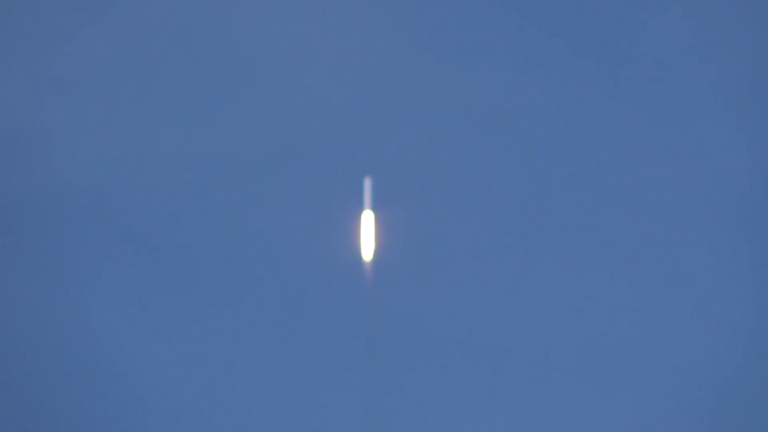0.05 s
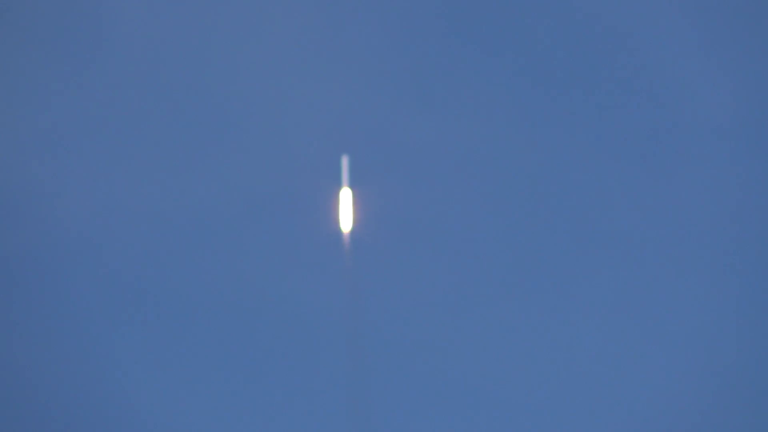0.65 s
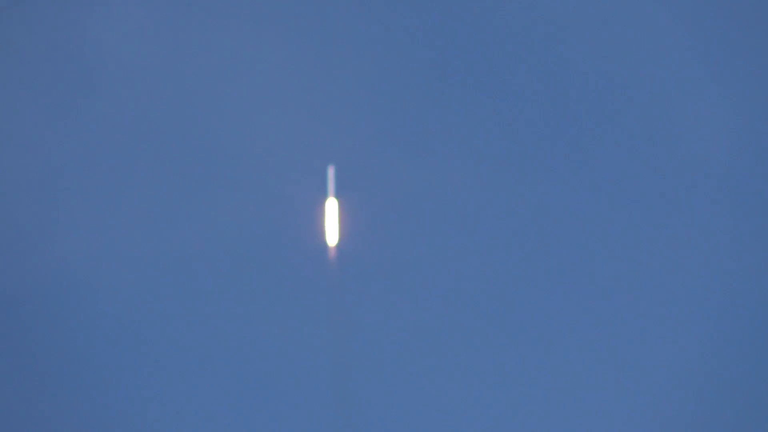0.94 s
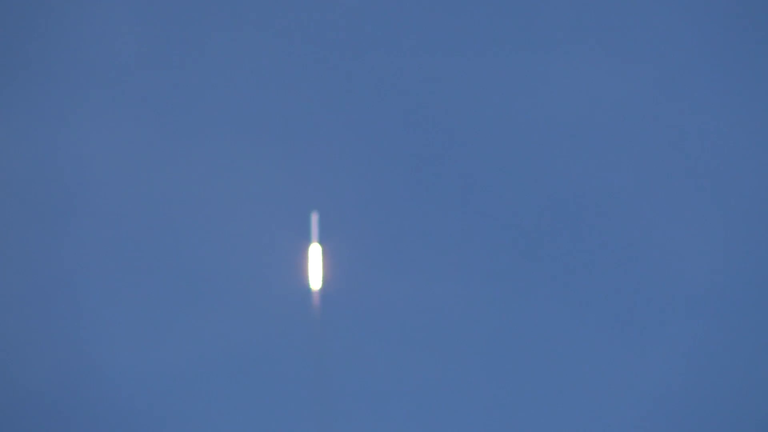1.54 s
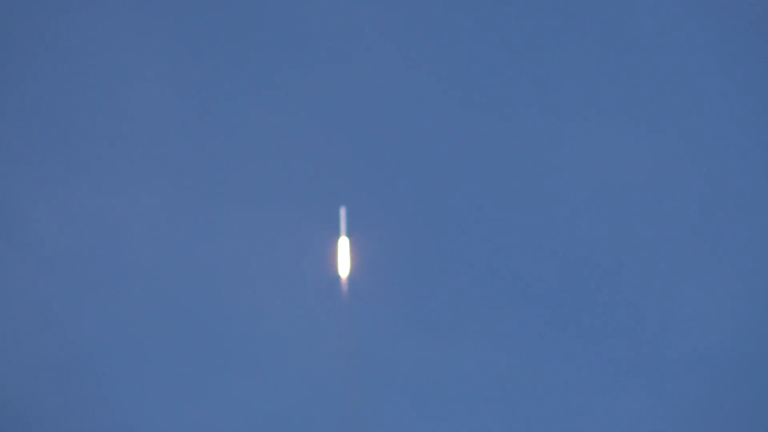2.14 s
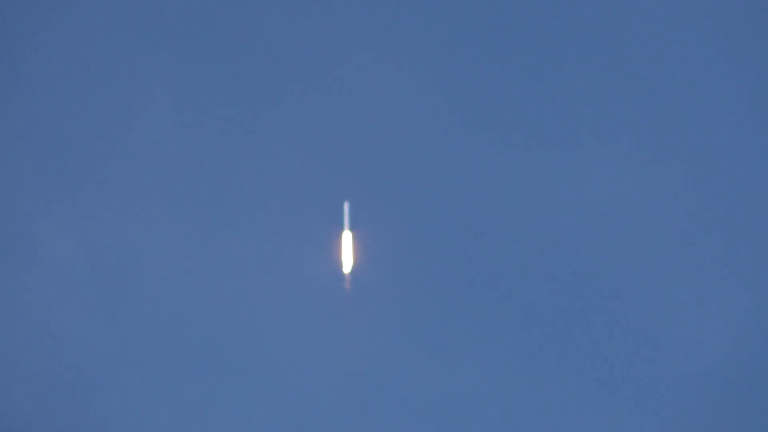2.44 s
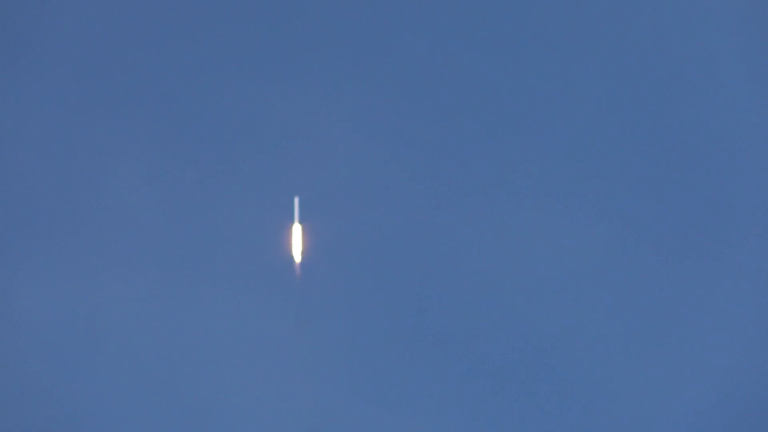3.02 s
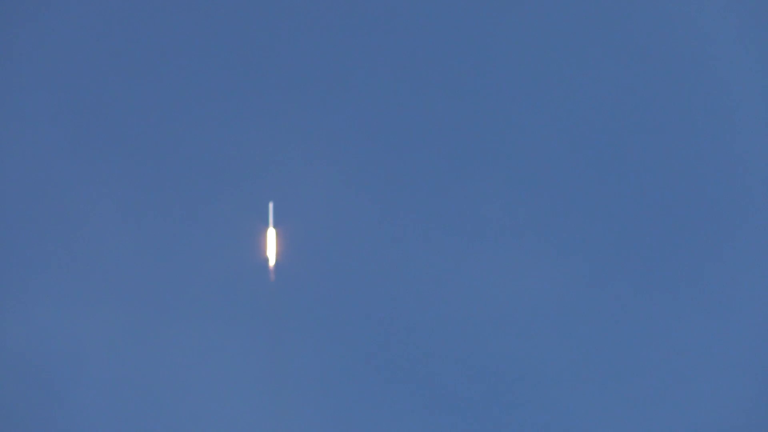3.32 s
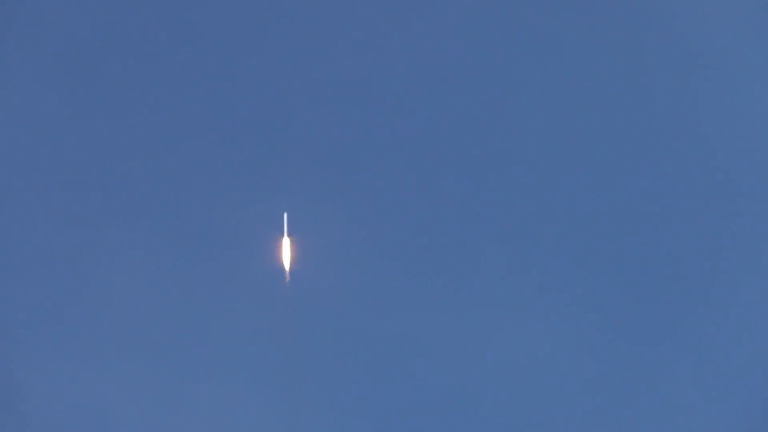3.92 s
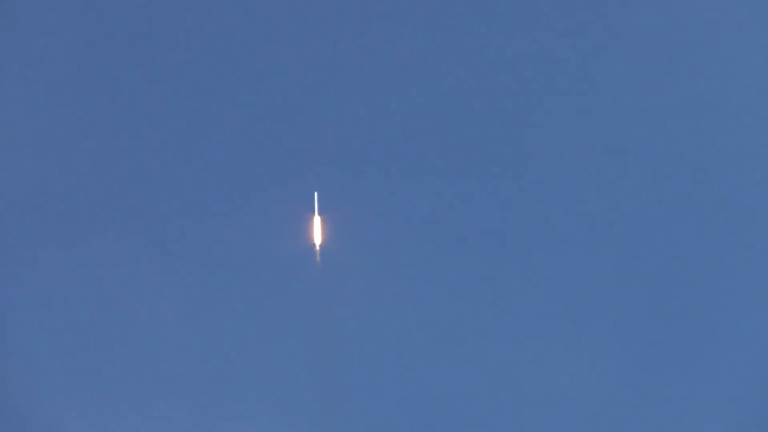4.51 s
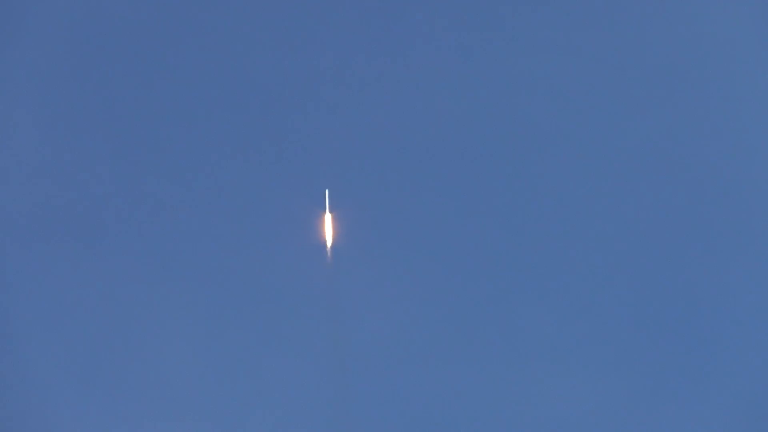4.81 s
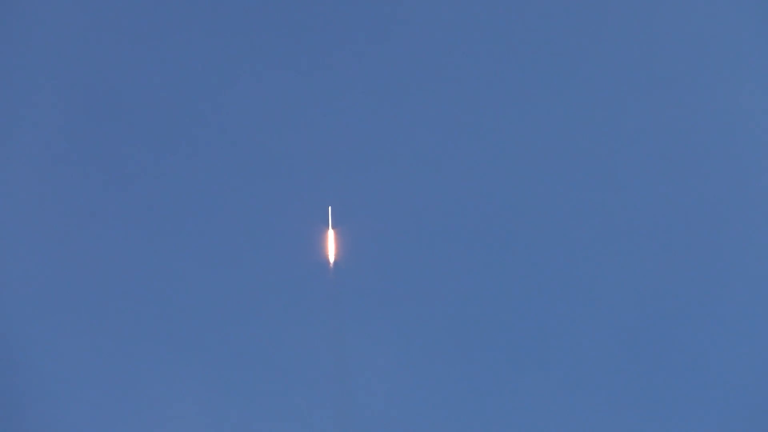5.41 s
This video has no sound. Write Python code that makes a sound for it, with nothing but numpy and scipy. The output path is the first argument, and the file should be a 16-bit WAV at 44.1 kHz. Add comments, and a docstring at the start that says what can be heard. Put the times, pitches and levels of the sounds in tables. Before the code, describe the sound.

A rocket climbs far overhead, heard from open ground through a small camera microphone. Its loud, deep rumble and wavering boom run throughout, under a rough roar dulled by distance. Irregular dull pops and crisp crackles break through from the start. Near the end the crackling grows sharper and denser, briefly overloading the microphone, with a faint tinny rattle.

```python
"""A rocket climbs far overhead, heard from open ground through a small camera's two microphone ports.
Big exhaust eddies rumble and boom; shock fronts bunch into a crackling roar, dulled by kilometres of air.
The hardest shocks pin the microphone for a moment, a loose part buzzes, and a limiter holds the peaks.
Far back in the mix sit a thin whine, tiny falling chirps and a faint hiss."""
import sys
import numpy as np
from scipy import signal
from scipy.fft import rfft, irfft
from scipy.io import wavfile
from scipy.ndimage import uniform_filter1d, minimum_filter1d

SR = 44100
rng = np.random.default_rng(int(sys.argv[2]) if len(sys.argv) > 2 else 0)


def unload_audio(sound):
    """Save the sound as a 16-bit wav file, at the path given as the first command line argument."""
    columns = np.transpose(np.atleast_2d(sound))
    # keep every value between -1 and 1, then stretch to whole-number steps
    steps = np.round(np.clip(columns, -1, 1) * 32767)
    wavfile.write(sys.argv[1], SR, steps.astype(np.int16))


N = 244975
T = np.arange(N) / SR
SIDE = np.array([[1], [-1]])  # adds to the left, subtracts from the right

# Table levels are relative: each layer applies its own trim and EQ.
# fader ride of the whine: t/s, level/dB
WHINE_RIDE = [(0, -92.5), (1.5, -90.5), (2.3, -86), (3.0, -96), (3.55, -87), (4.0, -96.5)]
# the chirps start lower as time passes: t/s, starting f/Hz
CHIRP_PITCH = [(0.4, 13200), (4.199, 7200)]
# short buzzes of a loose part on the camera: t/s, level/dB
BUZZ_CUES = [(0.0408, -42.5), (0.698, -39), (0.978, -31), (4.3859, -38), (4.555, -43), (4.608, -47),
             (4.7209, -38), (4.773, -43), (4.886, -37), (4.941, -47), (5.1613, -42.5), (5.327, -42.5),
             (5.494, -45)]
# the part chatters on once the shocks turn sharp: t/s, level/dB
CHATTER_RIDE = [(0, -82), (4.25, -86), (4.5, -72), (5.0, -80), (5.17, -69.5), (5.55, -73)]
# shocks that pin the microphone: t/s, hold/s, snap on sticking/dB, snap on release/dB
OVERLOAD_CUES = [(4.4938, 0.0044, -30, -25.5), (4.87, 0.0032, -38, -28.5), (4.9813, 0.0035, -37, -28),
                 (5.13, 0.0049, -39, -34)]
# steep fronts that snap in the treble: t/s, level/dB
SNAP_CUES = [(0.3439, -51), (0.385, -47), (0.7783, -48), (1.1672, -48), (1.2436, -45), (1.4077, -47),
             (1.5453, -43), (1.5775, -46), (1.6707, -44), (2.1314, -47), (2.2224, -46), (2.2962, -46),
             (2.32, -42.5), (2.4003, -40), (2.5015, -47), (2.5137, -46), (2.532, -44), (2.7606, -48),
             (3.197, -47), (3.3342, -48), (3.617, -44), (3.6714, -43), (3.686, -41.5), (3.763, -46),
             (3.924, -45.5), (3.9676, -47), (4.0465, -45.5), (4.1394, -41.5), (4.1659, -44),
             (4.2596, -44.5), (4.3229, -43), (4.3641, -44), (4.4008, -38), (4.5351, -40), (4.6999, -47),
             (4.7197, -45), (4.9779, -43), (5.371, -42), (5.4244, -43)]
# single strong shocks: t/s, dull pop/dB, crisp edge/dB, lull ahead/dB (negative gives a swell)
CRACK_CUES = [(0.345, -16.5, -29, 4), (0.387, -5.5, -27, -1.5), (0.506, -11.5, -34.5, 9),
              (0.643, -17, -31.5, 2), (0.725, -16.5, -43, -0.5), (0.864, -8.5, -40.5, 2.5),
              (0.964, -9, -40, 2), (1.019, -8, -25, 4.5), (1.036, -12, -35, -3), (1.142, -6, -27.5, 2),
              (1.471, -12.5, -44.5, 1.5), (1.575, -6, -27, 4.0), (1.615, -14.5, -29, 3),
              (1.675, -18.5, -33.0, -4), (1.731, -17.5, -35, 1.5), (1.829, -12, -35.5, 0.5),
              (2.022, -11, -36.5, 1), (2.129, -5.5, -22.5, -1.5), (2.238, -20.5, -24.5, 0),
              (2.265, -12.5, -34, 1), (2.29, -8, -31, 3.5), (2.318, -12, -28, 2), (2.363, -14.5, -34, 4),
              (2.428, -9.5, -24, 3), (2.458, -19.5, -32, -2.5), (2.499, -16, -30.5, 4),
              (2.609, -8.5, -25, 6), (2.757, -13, -28.5, 0.5), (2.795, -15, -28.5, 0),
              (3.035, -13.5, -31.5, 4.0), (3.165, -6.5, -35, 2.5), (3.764, -9.5, -23.5, 2.5),
              (4.043, -17, -47, 3), (4.165, -23.5, -28, 2), (4.223, -16, -28.5, -1.0), (4.251, -10, -30, 1),
              (4.323, -9.5, -33, 2), (4.361, -12.5, -31, -1), (4.4, -10.5, -24.5, 3.5),
              (4.426, -17, -31, -5), (4.451, -15.5, -35, 5), (4.488, -11.5, -24.5, 6),
              (4.527, -7.5, -23.5, -0.5), (4.648, -10.5, -26, 5), (4.699, -9, -34.5, 4),
              (4.724, -11, -23.5, 2), (4.79, -16.5, -29, 1.5), (4.866, -14.5, -27, 11),
              (4.924, -9, -26.5, 0.0), (4.977, -14.5, -29, 5.5), (5.127, -14, -20, 7),
              (5.221, -7.5, -26.5, 4), (5.292, -10.5, -39, -0.5), (5.34, -10, -37.5, 3.5),
              (5.37, -11.5, -36.5, 2.5), (5.425, -13, -33, 4.5), (5.521, -13.5, -41.5, 0.5)]
# the plume's big eddies, deeper as it climbs: t/s, rumble/dB, boom/dB, growl/dB
EDDY_RIDE = [(0, -19.5, -13.5, -25), (0.4, -14.5, -16.5, -23), (0.92, -19, -13.5, -21.5),
             (1.2, -18, -13.5, -24.5), (1.7, -15.5, -16.5, -22.5), (2.3, -16.5, -16.5, -20.5),
             (2.6, -17.5, -16, -20.5), (3.0, -14, -19, -21), (3.8, -13.5, -22, -20), (4.6, -15, -21, -20),
             (5.55, -15.5, -19.5, -22.5)]
# the boom wanders and at times tightens to a hollow note: t/s, centre f/Hz, width/Hz
BOOM_BAND = [(0, 140.5, 69.89), (0.7, 160, 105), (0.9, 149.1, 35.99), (1.17, 153.9, 36.02),
             (1.32, 158.9, 39.83), (1.55, 172, 52.22), (2.25, 149.3, 99.65), (2.41, 200.4, 55),
             (2.62, 139.9, 44.98), (2.9, 170, 84.84), (3.3, 167.1, 73), (4.0, 140, 79.94),
             (5.55, 135, 74.7)]
# strength of the shock stream: t/s, roar/dB, edge against roar/dB
ROAR_RIDE = [(0, -27, -18), (0.6, -23.5, -18), (1.1, -26.5, -16.5), (1.5, -25.5, -21), (1.62, -27, -16.5),
             (1.95, -25.5, -21), (2.15, -22, -18.5), (2.46, -21.5, -18), (2.66, -25, -18.5),
             (3.7, -26, -18), (4.07, -26, -18.5), (4.25, -26.5, -15), (4.53, -26.5, -15),
             (5.1, -26.5, -14.5), (5.55, -28, -17)]
# EQ curves: f/Hz, level/dB
HISS_EQ = [(500, -0.5), (4000, -0.5), (7500, 4), (9500, -3), (16000, -2)]  # nearly flat
BUZZ_EQ = [(1500, -33), (3500, 6), (5000, 1), (5900, 2.5), (6800, -2.5), (8000, -2), (9400, -14.5),
           (10800, -9), (12500, -18.5), (16000, -31.5)]  # tinny
SNAP_EQ = [(1000, -8), (3000, 6.5), (4300, 4), (5500, -0.5), (8000, -6), (12000, -12), (16000, -17)]  # bright
POP_EQ = [(60, -5.5), (250, 6.5), (700, 11), (1100, -3), (2000, -25.5), (3000, -40.5), (4500, -53),
          (9000, -83)]  # dull knock
RUMBLE_EQ = [(8, -34), (20, -5.5), (30, -5.5), (45, -1.5), (62, -4), (85, 2), (105, -3.5), (130, -6),
             (220, -38)]  # sub and bass
GROWL_EQ = [(130, -28.5), (195, -0.5), (245, -1.5), (330, -1.5), (430, -4), (510, -18.5), (800, -43)]  # low mids
ROAR_EQ = [(100, -20.5), (300, -10), (450, 2), (500, 3), (580, 6), (780, 2.5), (1000, -5), (1400, -15),
           (2000, -46.5), (3200, -68.5)]  # mids
EDGE_EQ = [(600, -38.5), (1200, 0), (1700, 4.5), (2200, -1), (2700, -7), (3300, -15.5), (4200, -26),
           (6000, -39.5), (10000, -49.5)]  # upper-mid bite
# colour difference between the ports: f/Hz, left minus right/dB
PORT_BALANCE = [(30, 1.5), (60, 1.5), (91, 2.5), (140, 2.5), (210, 2), (320, -1.5), (490, -2), (740, 1),
                (1130, 0.5), (1710, 1), (2600, 0.5)]


def undb(db):
    """Decibels to gain."""
    return 10 ** (np.asarray(db) / 20)


def unit(x):
    """Scale to rms 1."""
    return x / np.sqrt(np.mean(x ** 2))


def steady(x, seconds):
    """Even out swells slower than the given time; rms 1."""
    return x / np.sqrt(uniform_filter1d(x ** 2, int(seconds * SR)) + 1e-12)


def curves(table):
    """One automation lane per column, in straight ramps between the table's times."""
    times, *columns = np.transpose(table)
    return [np.interp(T, times, column) for column in columns]


def colour(x, eq, size=32768):
    """Minimum-phase EQ, falling steeply above its last point; a lone impulse keeps its peak height."""
    hz, db = np.transpose(eq)
    f = np.maximum(np.fft.rfftfreq(size, 1 / SR), 1)
    skirt_db = -24 * np.log2(np.maximum(f / hz[-1], 1))
    gain = undb(np.interp(np.log(f), np.log(hz), db) + skirt_db)
    cepstrum = irfft(np.log(gain))
    cepstrum[1:size // 2] *= 2  # fold forward so nothing rings ahead of a hit
    cepstrum[size // 2 + 1:] = 0
    ring = irfft(np.exp(rfft(cepstrum)))
    return irfft(rfft(x, N) * rfft(ring / np.abs(ring).max(), N), N)


def walk(rate):
    """Smooth random modulation with `rate` new values a second; rms 1."""
    knots = rng.standard_normal(4096)
    return unit(uniform_filter1d(np.interp(T * rate, np.arange(len(knots)), knots), 64))


def noise_band(centre_hz, width_hz):
    """A noise band whose centre and width can drift: the narrower it is, the slower it sways."""
    widest = width_hz.max()
    lowpass = signal.butter(2, widest / 2, fs=SR, output="sos")
    noise = signal.sosfilt(lowpass, rng.standard_normal((2, N)))
    sway = [np.interp(np.cumsum(width_hz / widest), np.arange(N), row) for row in noise]
    phase = 2 * np.pi * np.cumsum(centre_hz) / SR
    return sway[0] * np.cos(phase) + sway[1] * np.sin(phase)


def impulses(times, db):
    """One impulse per cue."""
    out = np.zeros(N)
    np.add.at(out, np.clip((np.asarray(times) * SR).astype(int), 0, N - 1), undb(db))
    return out


def shocks(rate, spread_db):
    """Upward pressure jumps of uneven size at random moments, about `rate` a second."""
    arrives = rng.random(N) < rate / SR
    train = arrives * undb(spread_db * np.minimum(rng.standard_normal(N), 2.3))
    return train - train.mean()


def scattered(x, trail_s, trail_share):
    """Each front trails its own brief scatter from nearby surfaces."""
    power = signal.lfilter([1], [1, -np.exp(-2 / (trail_s * SR))], x ** 2 + 1e-18)
    return x + trail_share * np.sqrt(power) * rng.standard_normal(N)


def billows(lull_share, lead_s, surge, surge_s, growth):
    """Duck, then surge: a strong front swallows the weak ones ahead and drags a bunch behind."""
    times, _, edge_db, lulls_db = np.transpose(CRACK_CUES)
    surges_db = surge * undb(growth * (edge_db - edge_db.mean()))  # crisp cracks surge harder
    db = np.zeros(N)
    for t, lull_db, surge_db in zip(times, lulls_db, surges_db):
        near = np.abs(T - t) < .3
        age = T[near] - t
        before = -lull_share * lull_db * np.exp(-(age / lead_s) ** 2)
        after = surge_db * np.exp(-np.abs(age) / surge_s)
        db[near] += np.where(age < 0, before, after)
    return undb(uniform_filter1d(uniform_filter1d(db, size=80), size=80))


def hiss(level_db=-77, width=.3):
    """A faint bed of flickering hiss, slightly different at each port."""
    mid, side = (unit(colour(rng.standard_normal(N), HISS_EQ)) for _ in range(2))
    return undb(level_db + 2.5 * walk(rate=110)) * (mid + width * side * SIDE)


def whine(centre_hz=10150, width_hz=200, flutter_db=2):
    """A thin whine, like a tiny motor, flutters, swells and fades."""
    ride_db, = curves(WHINE_RIDE)
    gain = undb(ride_db + flutter_db * walk(rate=20))
    return gain * unit(noise_band(np.full(N, centre_hz), np.full(N, width_hz)))


def chirps(count=80, length_s=.016, fall_per_s=24, loudest_db=-70, range_db=6):
    """Faint, high chirps slide down at random moments."""
    (first_s, last_s), start_hz = np.transpose(CHIRP_PITCH)
    age = T[T < length_s]
    envelope = np.sin(np.pi * np.sqrt(age / length_s)) ** 2
    out = np.zeros(N)
    for when, pitch, size in rng.random((count, 3)):
        detune = 1 + .25 * (pitch - .5)
        hz = np.interp(when, [0, 1], start_hz) * detune * np.exp(-fall_per_s * age)
        tone = np.sin(2 * np.pi * np.cumsum(hz) / SR)
        start = int((first_s + when * (last_s - first_s)) * SR)
        out[start:start + len(age)] += undb(loudest_db - range_db * (1 - size)) * envelope * tone
    return out


def buzzes(fade_s=0.0024, width=.35, cue_trim_db=-5, fitful_db=2.0):
    """A loose part on the camera chatters in fits of a few milliseconds, most after crisp cracks."""
    times, db = np.transpose(BUZZ_CUES)
    chatter_db, = curves(CHATTER_RIDE)
    shaken = billows(lull_share=1.15, lead_s=.03, surge=1.0, surge_s=0.078, growth=.7)
    chatter = np.maximum(shocks(rate=450, spread_db=5.0), 0) * shaken
    chatter *= undb(chatter_db + fitful_db * walk(rate=27))
    knocks = impulses(times, db + cue_trim_db) + chatter
    envelope = signal.fftconvolve(knocks, np.exp(-T[:2048] / fade_s))[:N]
    mid, side = (unit(colour(rng.standard_normal(N), BUZZ_EQ)) for _ in range(2))
    return envelope * (mid + width * side * SIDE)


def pinned(x, sag=.6, relax_hz=14):
    """The diaphragm sticks at its stop, so all detail vanishes until it comes free."""
    out = x.copy()
    for t, hold_s, *_ in OVERLOAD_CUES:
        stick, free = int(t * SR), int((t + hold_s) * SR)
        # the coupling capacitor makes the held signal sag and recover
        droop = sag * np.sin(np.linspace(0, np.pi, free - stick))
        out[stick:free] = np.linspace(x[stick], x[free], free - stick) - droop
    return signal.sosfilt(signal.butter(1, relax_hz, "high", fs=SR, output="sos"), out)


def snaps(width=.22, cue_trim_db=7.5, faint_db=-49, faint_growth=.45, hit_lead_s=0.0012):
    """Steep fronts keep a little treble: singly, around each overload, and faintly through the roar."""
    snap_s, snap_db = np.transpose(SNAP_CUES)
    stick_s, hold_s, stick_db, free_db = np.transpose(OVERLOAD_CUES)
    roar_db, sharp_db = curves(ROAR_RIDE)
    edge_db = roar_db + sharp_db
    train = shocks(rate=57, spread_db=3.3) * undb(faint_db + faint_growth * (edge_db - edge_db.mean()))
    train += impulses(snap_s, snap_db + cue_trim_db)
    # the diaphragm hits its stop just before it is held, and snaps again on release
    train += impulses(stick_s - hit_lead_s, stick_db) + impulses(stick_s + hold_s, free_db)
    mid = scattered(train, trail_s=0.00059, trail_share=0.058)
    # short waves bounce about the camera body differently on their way to each port
    side = scattered(train, trail_s=.001, trail_share=.15) - train
    return colour(mid, SNAP_EQ) + width * colour(side, SNAP_EQ) * SIDE


def cracks(rise_s=0.0009, max_gap_s=.0052, step_db=-4, pop_trim_db=0.5, edge_trim_db=-2):
    """The strongest fronts land as dull pops with a crisp edge; two weaker followers add the rasp."""
    starts, pop_db, edge_db, _ = np.transpose(CRACK_CUES)
    gaps = max_gap_s * rng.uniform(0.45, 1, (len(starts), 3))
    times = (starts[:, None] + rise_s + np.cumsum(gaps, axis=1) - gaps[:, :1]).ravel()
    bunch = lambda db: impulses(times, (db[:, None] + step_db * np.arange(3)).ravel())
    pops = scattered(bunch(pop_db + pop_trim_db), trail_s=0.0012, trail_share=0.028)
    edges = scattered(bunch(edge_db + edge_trim_db), trail_s=0.007, trail_share=0.085)
    return colour(pops, POP_EQ) + colour(edges, EDGE_EQ)


def eddies(rumble_trim_db=2, boom_trim_db=1):
    """The low end: big exhaust eddies make a deep rumble under a wandering boom."""
    rumble_db, boom_db, _ = curves(EDDY_RIDE)
    rumble = steady(colour(rng.standard_normal(N), RUMBLE_EQ), seconds=0.086)
    boom = steady(noise_band(*curves(BOOM_BAND)), seconds=0.082)
    return rumble * undb(rumble_db + rumble_trim_db) + boom * undb(boom_db + boom_trim_db)


def shock_roar(growl_trim_db=1.6, roar_trim_db=0.16, edge_trim_db=-1.6, swell_db=-0.14):
    """The rocket's voice: one stream of shock fronts feeds a growl, a roar and a crisp edge."""
    *_, growl_db = curves(EDDY_RIDE)
    roar_db, sharp_db = curves(ROAR_RIDE)
    # fronts merge on the way down, so they arrive in bunches
    fronts = shocks(rate=2600, spread_db=1.0) * undb(1.2 * walk(rate=100))
    growl = steady(colour(fronts, GROWL_EQ), seconds=0.18) * undb(growl_db + growl_trim_db)
    roar = steady(colour(fronts, ROAR_EQ), seconds=0.044) * undb(roar_db + roar_trim_db)
    # turbulent air rounds off some bunches more than others, and lets the whole stream swell
    rounded = fronts * undb(1.3 * walk(rate=200))
    edge = steady(colour(rounded, EDGE_EQ), seconds=0.06) * undb(roar_db + sharp_db + edge_trim_db)
    swell = undb(swell_db * walk(rate=8.7))
    body = (growl + roar) * billows(lull_share=0.9, lead_s=0.038, surge=0.34, surge_s=0.084, growth=0.24)
    crisp = edge * billows(lull_share=0.66, lead_s=0.08, surge=2.07, surge_s=0.045, growth=0.99)
    return (body + crisp) * swell


def scene():
    """The far rocket reaches both ports together, tinted a little for each; small layers go on top."""
    rocket = rfft(pinned(eddies() + shock_roar() + cracks()))
    hz, balance_db = np.transpose(PORT_BALANCE)
    f = np.fft.rfftfreq(N, 1 / SR)
    lean = undb(np.interp(np.log(f + 1), np.log(hz), balance_db) / 2)
    ports = np.array([irfft(rocket * lean, N), irfft(rocket / lean, N)])
    return ports + snaps() + buzzes() + whine() + chirps() + hiss()


def record(dry, hold_s=0.006, drive_db=-0.2, ceiling=.66, top_hz=15800):
    """A look-ahead limiter rides the loudest swings; a steep low-pass cuts the top."""
    driven = dry * undb(drive_db)
    span = int(hold_s * SR)
    needed = np.minimum(1, ceiling / (np.abs(driven.mean(axis=0)) + 1e-9))
    held = minimum_filter1d(needed, span)
    gain = uniform_filter1d(uniform_filter1d(held, span // 2), span // 2)
    return signal.sosfilt(signal.ellip(8, .2, 70, top_hz, fs=SR, output="sos"), driven * gain)


dry = scene()
out = record(dry)
unload_audio(out)
```